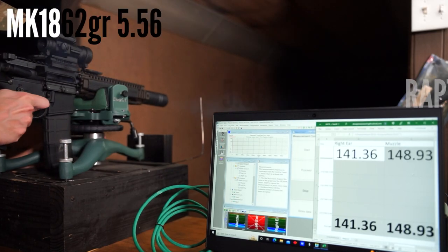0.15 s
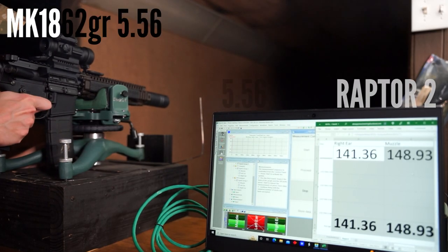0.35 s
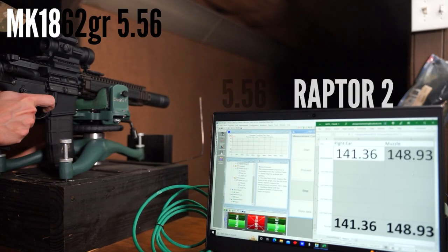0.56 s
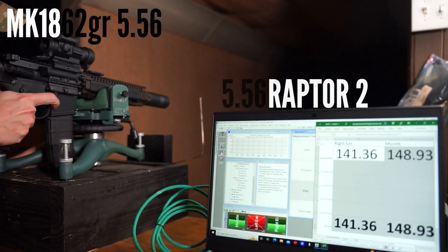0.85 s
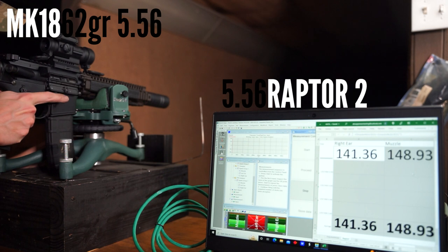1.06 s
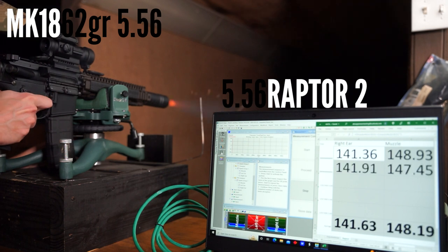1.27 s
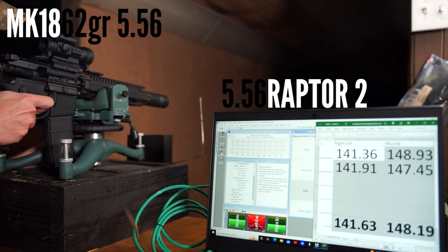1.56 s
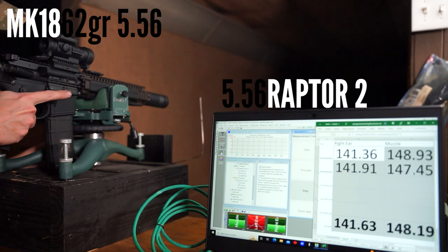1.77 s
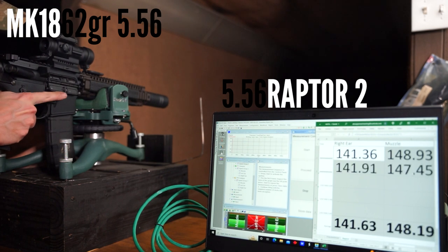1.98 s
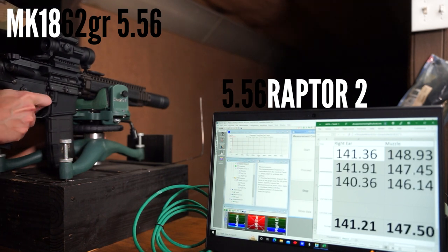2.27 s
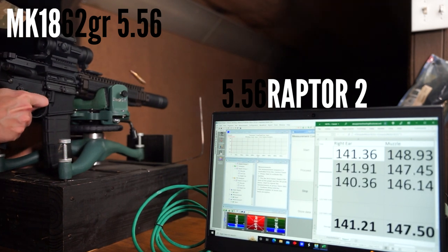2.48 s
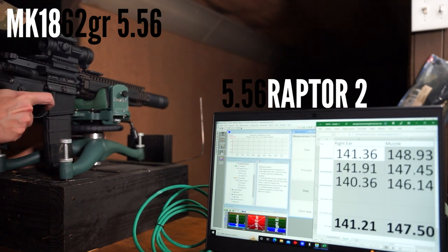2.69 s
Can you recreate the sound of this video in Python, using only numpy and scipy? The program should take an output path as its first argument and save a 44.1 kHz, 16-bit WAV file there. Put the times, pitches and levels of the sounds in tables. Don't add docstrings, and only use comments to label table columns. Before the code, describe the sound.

Three suppressed rifle shots crack and roar in a closed room, with spent brass cases tinkling.

```python
import sys
import numpy as np
from scipy import signal
from scipy.fft import rfft, irfft, next_fast_len
from scipy.io import wavfile
from scipy.ndimage import uniform_filter1d

SR = 44100
rng = np.random.default_rng(int(sys.argv[2]) if len(sys.argv) > 2 else 0)


def to_linear_factor(level_db):
    exponent = np.asarray(level_db, float) / 20
    return 10 ** exponent


def master_out(mix):
    frames = np.transpose(np.atleast_2d(mix))
    ceiling = np.clip(frames, -1, 1)
    pcm = np.round(ceiling * 32767).astype(np.int16)
    wavfile.write(sys.argv[1], SR, pcm)


N = 125685
T = np.arange(N) / SR

CHANGES_S = 1.2875, 2.3305
BEAT_HZ, BEAT_A_DB, BEAT_B_DB = 45, -4, -16


def unit(x):
    return x / np.sqrt(np.mean(x ** 2) + 1e-20)


def along(points, hz):
    f, v = np.transpose(points)
    return np.interp(np.log(hz + 1), np.log(f + 1), v)


def filtered(x, response):
    m = next_fast_len(len(x) + 8192)
    hz = np.fft.rfftfreq(m, 1 / SR)
    return irfft(rfft(x, m) * response(hz), m)[:len(x)]


def noise(spectrum, size=N):
    white = rng.standard_normal(size)
    return unit(filtered(white, lambda hz: to_linear_factor(along(spectrum, hz))))


def peak(f, hz, width):
    damping = 1j * f * width
    return damping / (hz * hz - f * f + damping + 1e-9)


def add(track, s, x):
    end = min([round(c * SR) for c in CHANGES_S if c > s] + [N])
    part = track[round(s * SR):end][:len(x)]
    part += x[:len(part)]


def dying(x, hold_s, slower):
    # frequency in Hz, decay time to -60 dB in seconds.
    room_decay = [(60, 0.56), (300, .5), (1000, 0.59), (2500, 0.69), (5000, 0.86), (9000, 0.64),
                  (15000, 0.39)]
    hz, t, z = signal.stft(x, SR, nperseg=512)
    t60 = slower * along(room_decay, hz)[:, None]
    z = z * to_linear_factor(-60 * np.maximum(t - hold_s, 0) / t60)
    return signal.istft(z, SR, nperseg=512)[1][:len(x)]


def ring(t, hz, db, t60, beat_db):
    strike_db, strike_t60_s = 2, 0.02
    twin_hz = hz + BEAT_HZ * rng.uniform(0.5, 1.6)
    twin = to_linear_factor(beat_db) * np.sin(2 * np.pi * (twin_hz * t + rng.random()))
    decay = to_linear_factor(-60 * t / t60) + to_linear_factor(strike_db - 60 * t / strike_t60_s)
    return to_linear_factor(db) * decay * (np.sin(2 * np.pi * hz * t) + twin)


def ventilation():
    # frequency in Hz, level in dB, bandwidth in Hz.
    wavering_hum = [(119, -62, 27), (159.2, -60.5, 27), (245.8, -63, 13), (308, -68.5, 11)]
    # frequency in Hz, level in dB.
    steady_hum = [(119.5, -54), (239, -64), (298, -63)]
    # frequency in Hz, spectral level of the rush in dB per Hz.
    rush = [(25, -23.5), (110, 1), (330, -7), (550, -13), (1000, -18), (2000, -14.5), (3200, -24),
            (4600, -21.5), (6500, -29.5), (16000, -42.5)]
    # time in seconds, microphone gain in dB.
    ducking = [(0, 8.5), (.186, 8.5), (.191, -4), (.3, -1), (.8, -1.5), (1.286, 0), (1.337, -2),
               (1.341, -11), (1.5, -12), (2.329, -9), (2.384, -3), (2.387, -21.5), (2.85, -16.5)]
    recovery_db = 9, 6.5
    rush_db = -54
    thud_s, thud_db, thud_hz, thud_t60_s = 1.0, -41, 80, .25

    sound = to_linear_factor(rush_db) * noise(rush)
    for hz, db, width in wavering_hum:
        band = filtered(rng.standard_normal(N), lambda f: peak(f, hz, width) ** 2)
        sound += to_linear_factor(db) * unit(band)
    for hz, db in steady_hum:
        sound += to_linear_factor(db) * np.sqrt(2) * np.sin(2 * np.pi * hz * T)
    t = np.maximum(T - thud_s, 0)
    swell = 1 - np.exp(-t / 0.0081)
    sound += to_linear_factor(thud_db - 60 * t / thud_t60_s) * np.sin(2 * np.pi * thud_hz * t) * swell
    gain_db = np.interp(T, *np.transpose(ducking))
    for s, db in zip(CHANGES_S, recovery_db):
        gain_db = gain_db + db * (T > s)
    return to_linear_factor(gain_db) * sound


def hiss():
    # frequency in Hz, spectral level in dB per Hz.
    jet = [(240, -37), (400, -8.5), (1440, -12.5), (1680, -17.5), (1930, -6), (3250, -6.5), (4290, -4),
           (6810, -4), (15900, -11)]
    # time in seconds, level in dB.
    jet_level = [(2.3305, -32.5), (2.384, -32), (2.387, -43), (2.41, -39.5), (2.6, -43.5), (2.85, -46.5)]
    level_db = np.interp(T, *np.transpose(jet_level))
    return (T > CHANGES_S[1]) * to_linear_factor(level_db) * noise(jet)


def brass_rings(out, t):
    # mode frequency in Hz, decay time to -60 dB in seconds.
    case_a = [(11020, 0.22), (15000, 0.095), (8590, 0.16), (4495, 0.15), (13900, .15)]
    # mode frequency in Hz, decay time to -60 dB in seconds.
    case_b = [(10890, 0.21), (15230, 0.24)]
    # start in seconds, then tick, low ring, high ring and side rings in dB.
    bounces_a = [
        (.583, -42, -49.5, -55, -75),
        (.8112, -24.5, -43.5, -29, -77),
        (.9411, -40, -60, -54, -46.5),
        (.956, -49, -62, -62, -61),
        (1.238, -40, -68, -60, -75),
        (1.243, -31, -51, -60, -64),
    ]
    # start in seconds, then tick, low ring and high ring in dB.
    bounces_b = [
        (1.701, -59, -72, -55),
        (1.8855, -52, -55, -60),
        (2.0027, -61.5, -77, -58),
        (2.11, -68, -74, -72),
        (2.164, -58, -70, -74),
        (2.2, -70, -69, -72),
        (2.24, -70, -69, -72),
    ]
    # frequency in Hz, level of the contact tick in dB.
    tick_colour = [(2500, -20), (5000, -4.5), (7500, 5), (11000, -9), (15000, 1)]
    tick_t60_s = 0.0042
    for rows, modes, beat_db in ((bounces_a, case_a, BEAT_A_DB), (bounces_b, case_b, BEAT_B_DB)):
        for s, tick_db, low_db, high_db, *side in rows:
            levels = [low_db, high_db] + [db + d for db in side for d in (0, -1, -11)]
            hit = to_linear_factor(tick_db - 60 * t / tick_t60_s) * noise(tick_colour, size=len(t))
            for (hz, t60), db in zip(modes, levels):
                hit += ring(t, hz, db, t60, beat_db)
            add(out, s, hit)


def wood_taps(out, t):
    # start in seconds, peak in dB, extra level of the uppermost resonance in dB.
    taps = [(0.582, -22.5, -7), (1.6866, -16, -22), (1.6964, -17, -7), (1.8867, -30.5, -9),
            (1.9076, -23, -16), (2.0024, -29, -13), (2.0198, -25.5, -16), (2.0477, -35.5, -13),
            (2.0921, -30, -18.5), (2.1076, -36, -10.5), (2.1335, -34, -19), (2.165, -32, -12),
            (2.2036, -31, -16), (2.232, -36, -10), (2.2565, -39, -17), (2.2712, -40, -15)]
    # resonance in Hz, width in Hz, level in dB.
    wood = [(680, 990, -9), (1970, 350, 1.5), (2850, 1840, -4), (4400, 1500, 7.5)]
    tap_db, tap_t60_s, snap = -3, .016, 9
    for s, db, upper_db in taps:
        shift = rng.uniform(0.69, 1.2)

        def board(f):
            total = 0
            for k, (hz, width, level_db) in enumerate(wood):
                gain = to_linear_factor(level_db + upper_db * (k == 3))
                total = total + (-1) ** k * gain * peak(f, hz * shift, width)
            return total * peak(f, 2050, 6600)

        knock = (rng.standard_normal(len(t)) + snap * (t == 0)) * to_linear_factor(-60 * t / tap_t60_s)
        tap = filtered(knock, board)
        add(out, s, to_linear_factor(db + tap_db) * tap / np.abs(tap).max())


def tin_strikes(out, t):
    # start in seconds, level in dB.
    strikes = [
        (.939, -45),
        (.955, -43),
    ]
    # mode frequency in Hz, level in dB, decay time to -60 dB in seconds.
    tin = [(942, -4, .13), (1527, -8.5, 0.63), (1910, -8, 0.19), (2900, -16, 0.039), (5100, -14, .15)]
    # frequency in Hz, spectral level of the rattle in dB per Hz.
    rattle_colour = [(400, -50), (900, 11.5), (2000, 0), (5000, 3.5), (10000, -7), (16000, -28)]
    rattle_db, rattle_t60_s = 5, 0.078
    for s, db in strikes:
        sound = to_linear_factor(rattle_db - 60 * t / rattle_t60_s) * noise(rattle_colour, size=len(t))
        for hz, level_db, t60 in tin:
            sound += ring(t, hz, level_db, t60, BEAT_B_DB)
        add(out, s, to_linear_factor(db) * (1 - np.exp(-t / 0.0014)) * sound)


def cases():
    out, t = np.zeros(N), np.arange(SR // 2) / SR
    brass_rings(out, t)
    wood_taps(out, t)
    tin_strikes(out, t)
    reflections_db = -9.5
    tail = dying(rng.standard_normal(SR // 2), 0, 0.56)
    wet = signal.fftconvolve(np.pad(out, (300, 0)), tail / np.linalg.norm(tail))[:N]
    no_spill = 1 - (T > CHANGES_S[0]) * (T < 1.5)
    return out + to_linear_factor(reflections_db) * wet * no_spill


def hammer_fall(t):
    hammer_db, hammer_hz = -31, 2400
    knock = rng.standard_normal(len(t)) * to_linear_factor(-60 * t / .03)
    fall = filtered(knock, lambda f: peak(f, hammer_hz, 500) + .12 * peak(f, 8000, 9000))
    return to_linear_factor(hammer_db) * fall / np.abs(fall).max()


def first_gas(t, lead_s):
    rising = (t < lead_s) * t / lead_s
    return to_linear_factor(-25) * np.diff(rng.standard_normal(len(t) + 1)) * rising


def muzzle_blast(t, blast_db, colour):
    # frequency in Hz, spectral level in dB per Hz.
    gas = [(40, -44), (100, -5), (600, -3.5), (1400, -4.5), (4000, -8.5), (9000, -11.5), (13000, -16.5),
           (16000, -18.5)]
    level_db, hold_s, t60_s, push_s, push_db = 7, .0095, .02, .0004, 14
    can_hz, can_t60_s, can_db = 1043, .008, 9
    envelope = to_linear_factor(level_db + blast_db - 60 * np.maximum(t - hold_s, 0) / t60_s)
    blast = envelope * filtered(noise(gas, size=len(t)), colour)
    u = t / push_s
    blast += to_linear_factor(push_db) * (1 - u) * np.exp(-u / 1.3)
    return blast + to_linear_factor(can_db - 60 * t / can_t60_s) * np.sin(2 * np.pi * can_hz * t)


def overload(t, x):
    start_db, sag_db, sag_s, hard = 2.5, -8, .0045, 8
    ceiling = to_linear_factor(start_db + sag_db * (1.5 - np.exp(-t / sag_s)))
    return x / (1 + np.abs(x / ceiling) ** hard) ** (1 / hard)


def room_answer(t, tail_db, colour):
    # frequency in Hz, spectral level in dB per Hz.
    roar_colour = [(30, -27), (70, 0.5), (300, -8.5), (600, -11), (1500, -9), (2600, -11), (4200, -12),
                   (8500, -17), (16000, -28)]
    # room mode in Hz, level in dB, decay time to -60 dB in seconds.
    room_modes = [(59.4, -27, 0.48), (77.2, -23.5, 0.16), (136.1, -19.5, 0.57), (159.3, -17.5, 0.33),
                  (249.2, -23.5, .5), (324.6, -27.5, 0.54)]
    roar_db, hold_s, late_db, late_slower, rise_s = -16.5, 0.073, -20.5, 1.9, .011
    grain_db, grain_s, boom_rise_s = 1, 0.0016, 0.053
    size = len(t)
    roar = dying(noise(roar_colour, size=size), hold_s, 0.89)
    roar = roar + to_linear_factor(late_db) * dying(noise(roar_colour, size=size), hold_s, late_slower)
    grain = unit(uniform_filter1d(rng.standard_normal(size), max(2, round(grain_s * SR))))
    roar = filtered(roar * to_linear_factor(grain_db * grain), colour)
    boom = np.zeros(size)
    for hz, db, t60 in room_modes:
        boom += to_linear_factor(db - 60 * t / t60) * np.sin(2 * np.pi * hz * t)
    roar = to_linear_factor(roar_db) * roar * (1 - np.exp(-(t / rise_s) ** 2))
    return to_linear_factor(tail_db) * (roar + boom * (1 - np.exp(-t / boom_rise_s)))


def shots():
    shot_s = .2008, 1.3508, 2.4138
    # blast, room tail, 4 kHz shriek and 1.5 kHz bark, all in dB.
    shot_levels = [
        (0, 0.5, -13.5, -1.5),
        (0, 1, -10, -9.5),
        (0, 0.5, 0, -12.5),
    ]
    hammer_lead_s, gas_lead_s = .0078, 0.00099
    shriek_hz, shriek_width_hz, bark_hz, bark_width_hz = 4200, 1200, 1550, 780
    out, t = np.zeros(N), np.arange(SR) / SR
    for s, (blast_db, tail_db, shriek_db, bark_db) in zip(shot_s, shot_levels):

        def colour(f):
            shriek = to_linear_factor(shriek_db) * np.abs(peak(f, shriek_hz, shriek_width_hz)) ** 2
            bark = to_linear_factor(bark_db) * np.abs(peak(f, bark_hz, bark_width_hz)) ** 2
            return 1 + shriek + bark

        add(out, s - hammer_lead_s, hammer_fall(t))
        add(out, s - gas_lead_s, first_gas(t, gas_lead_s))
        blast = overload(t, muzzle_blast(t, blast_db, colour))
        add(out, s, blast + room_answer(t, tail_db, colour))
    return out


def scene():
    return (ventilation() + hiss() + cases() + shots())[None]


def low_pass(x):
    return signal.sosfilt(signal.butter(12, 16150, fs=SR, output="sos"), x)


def record(dry):
    top_hz, ceiling = 16100, 1.2
    x = filtered(dry[0], lambda hz: np.clip((top_hz - hz) / 400, 0, 1))
    return low_pass(np.clip(x, -ceiling, ceiling)[None])


dry = scene()
out = record(dry)
master_out(out)
```